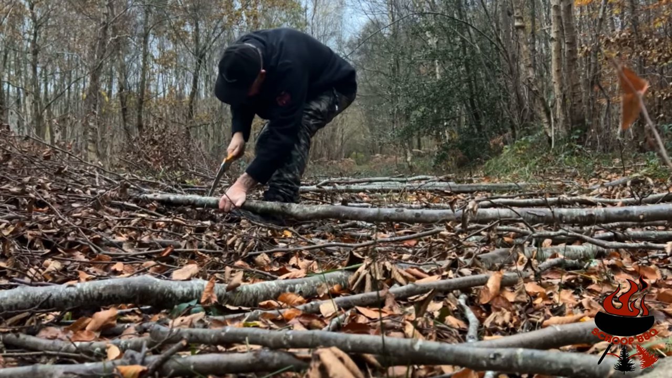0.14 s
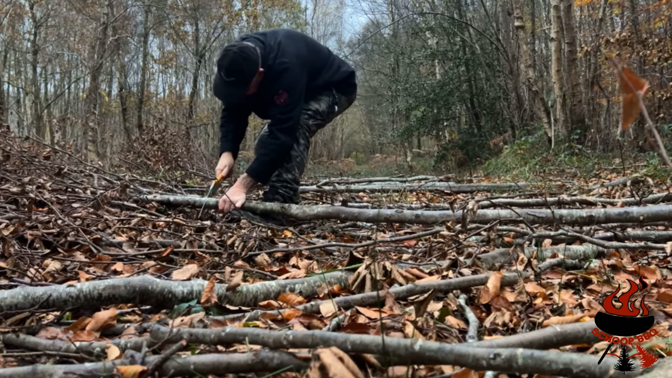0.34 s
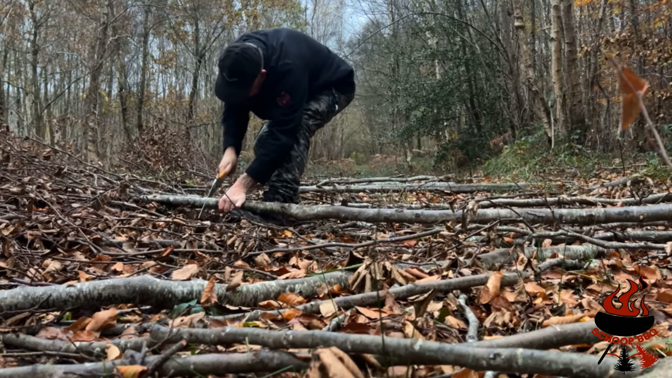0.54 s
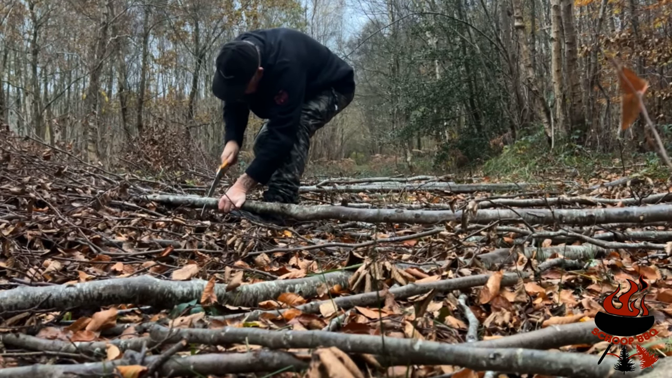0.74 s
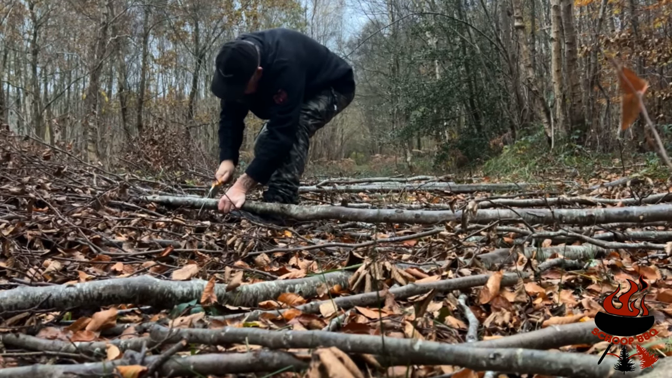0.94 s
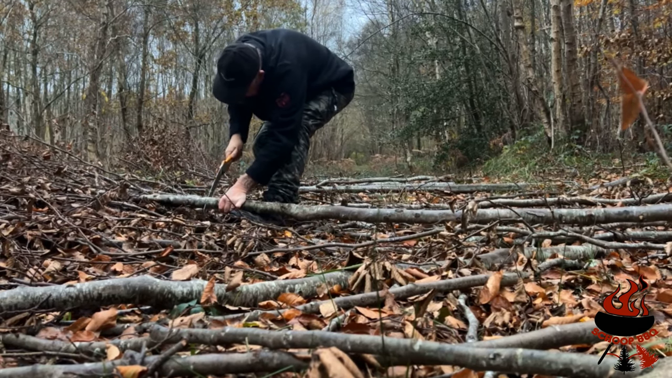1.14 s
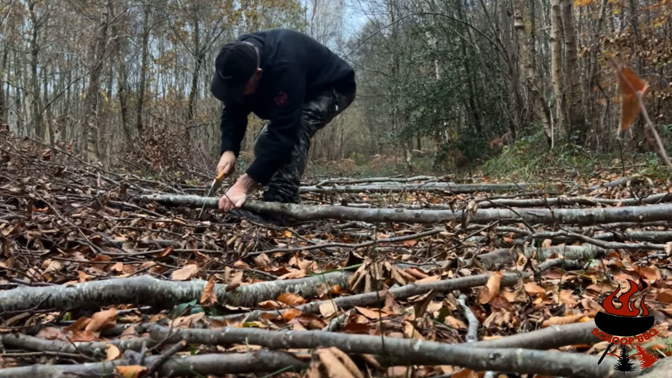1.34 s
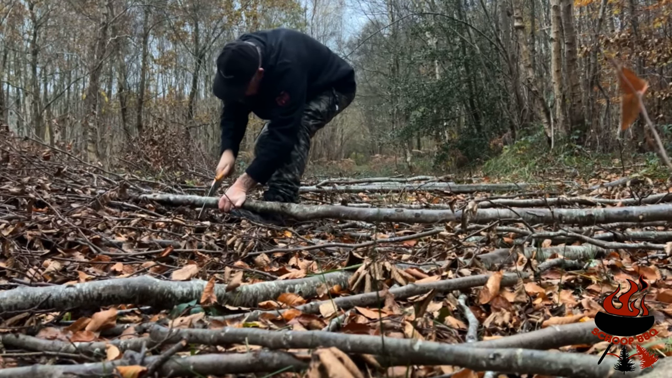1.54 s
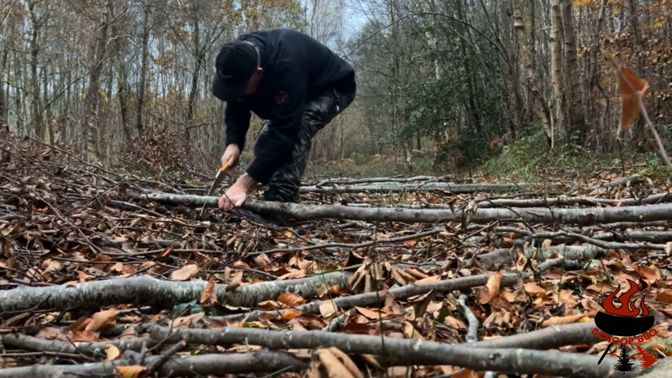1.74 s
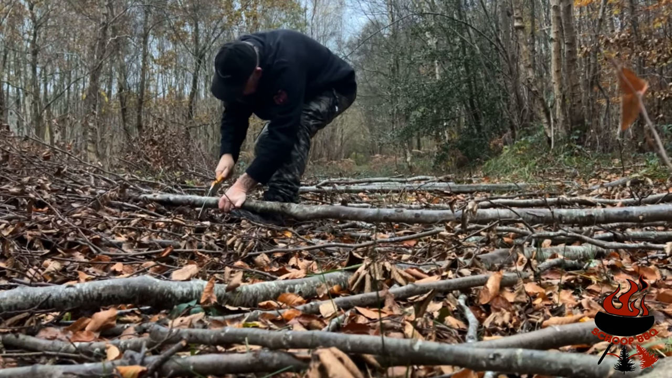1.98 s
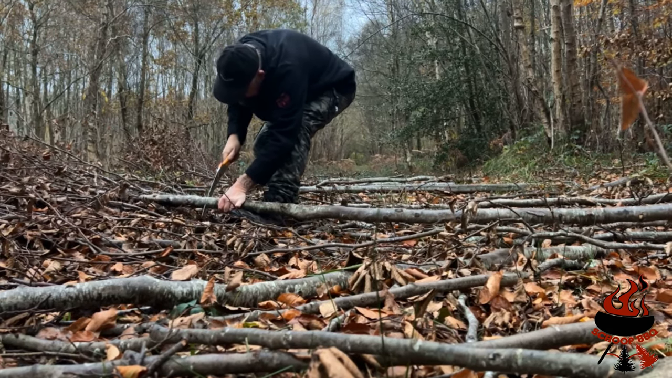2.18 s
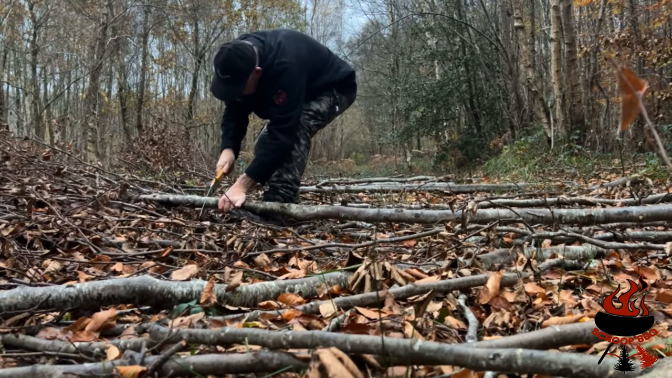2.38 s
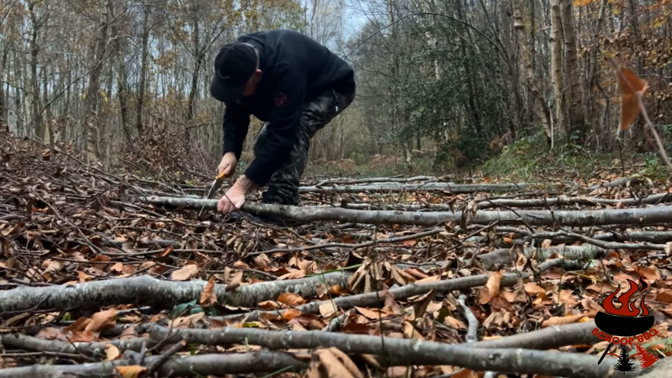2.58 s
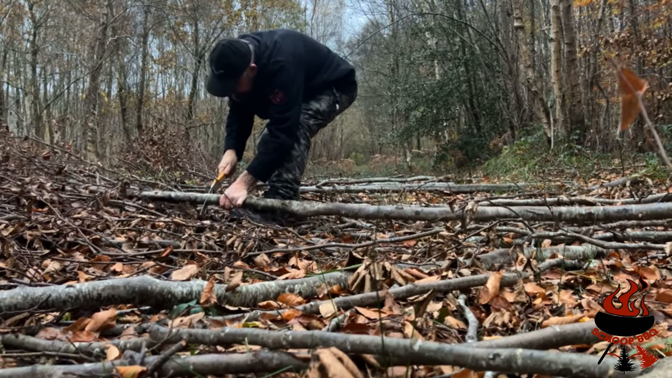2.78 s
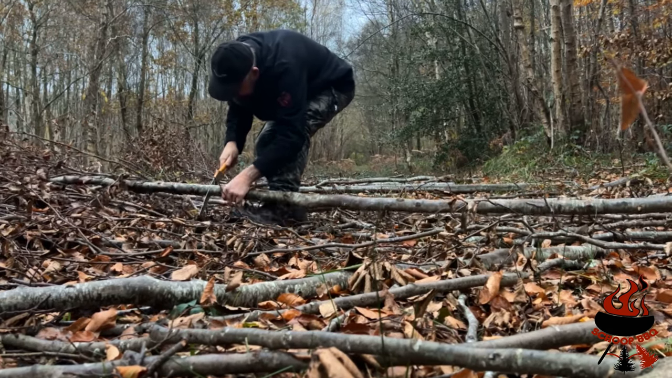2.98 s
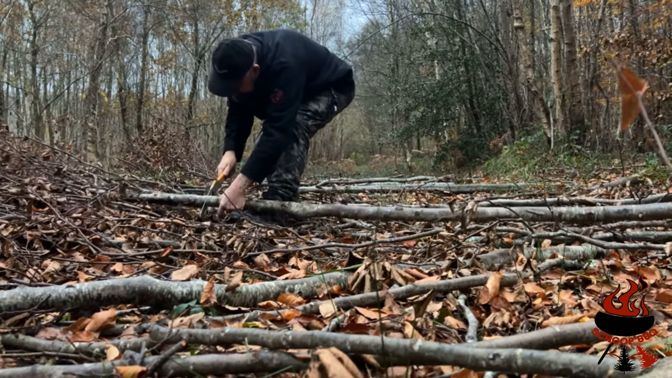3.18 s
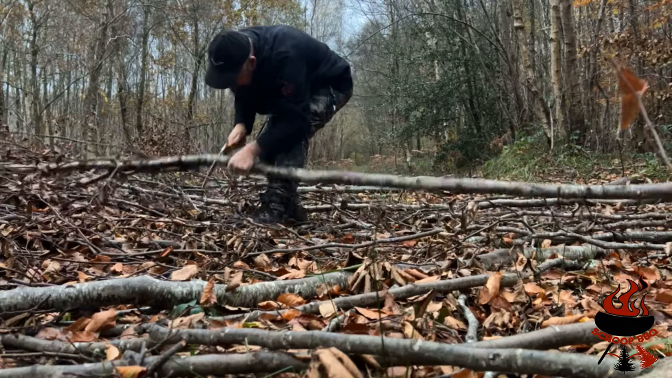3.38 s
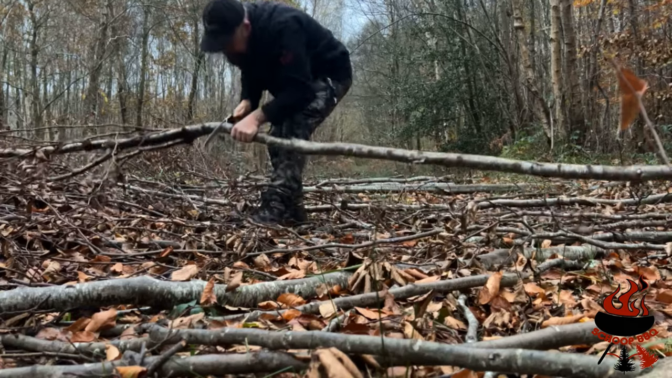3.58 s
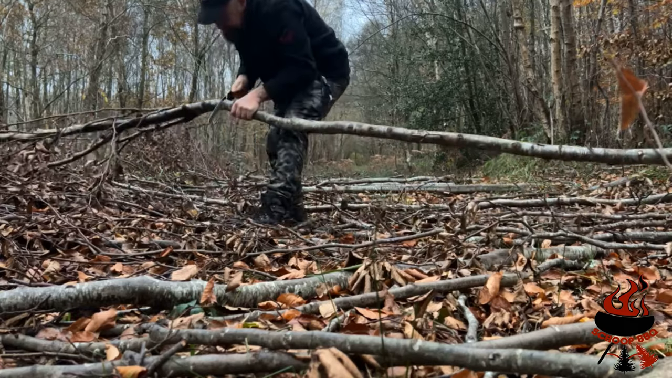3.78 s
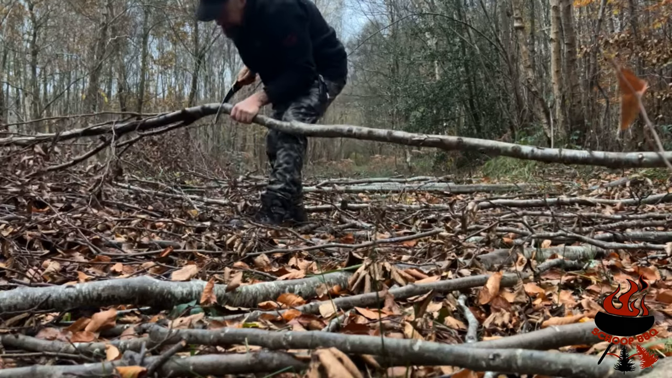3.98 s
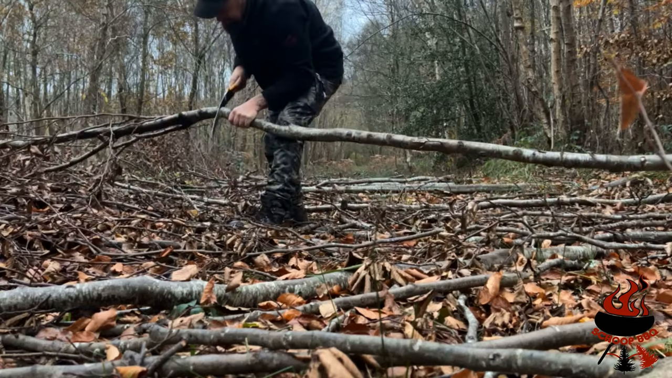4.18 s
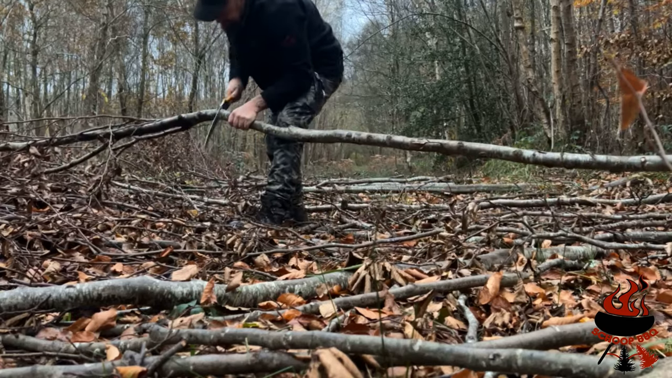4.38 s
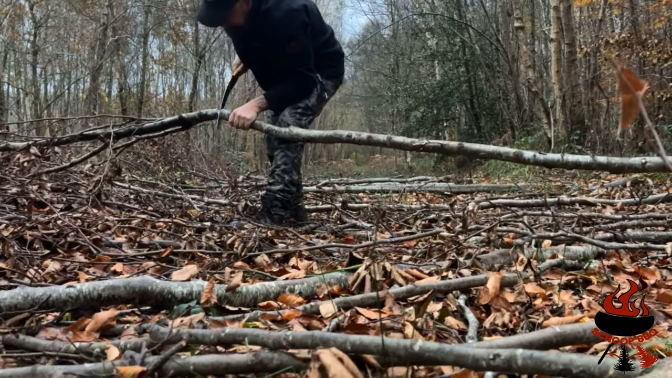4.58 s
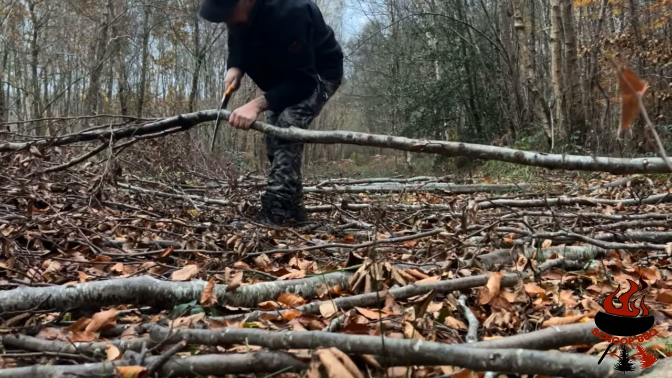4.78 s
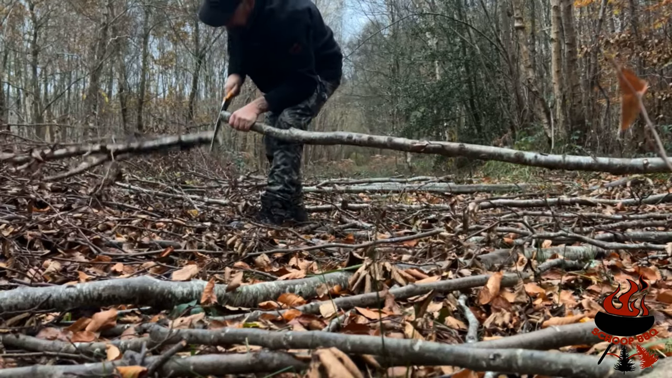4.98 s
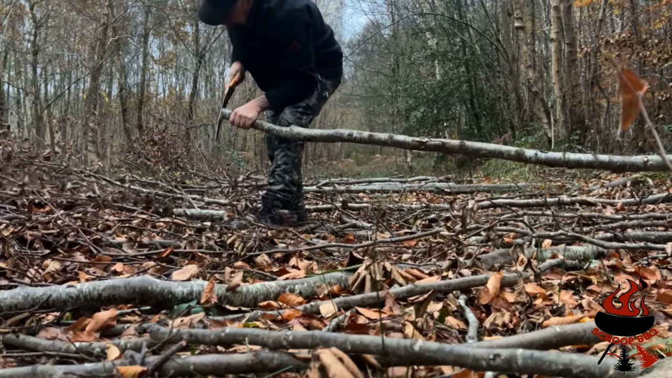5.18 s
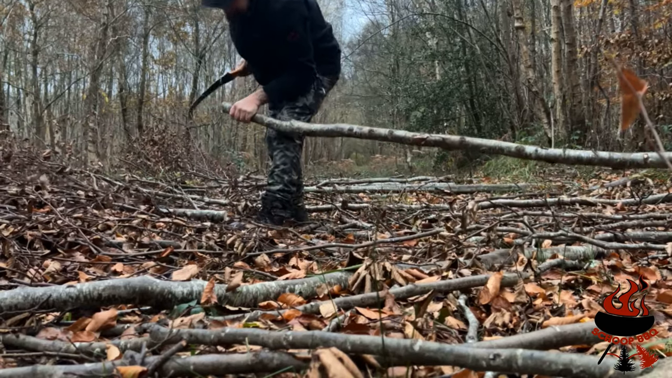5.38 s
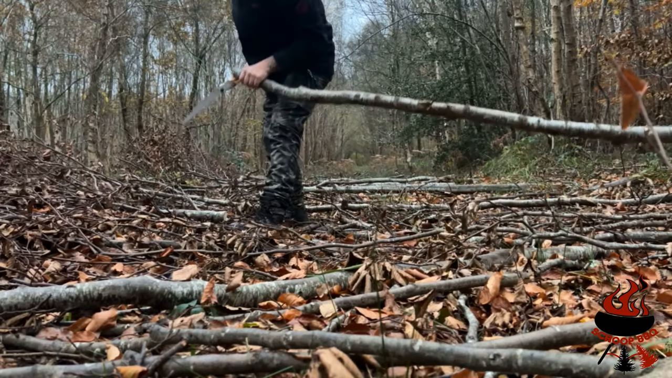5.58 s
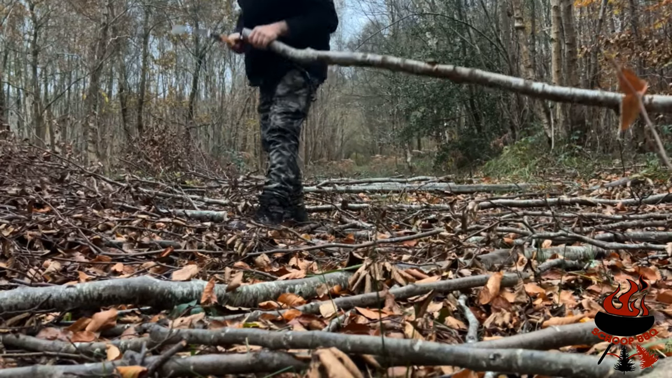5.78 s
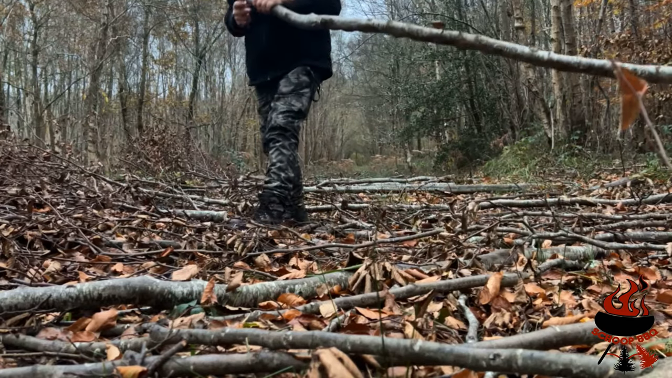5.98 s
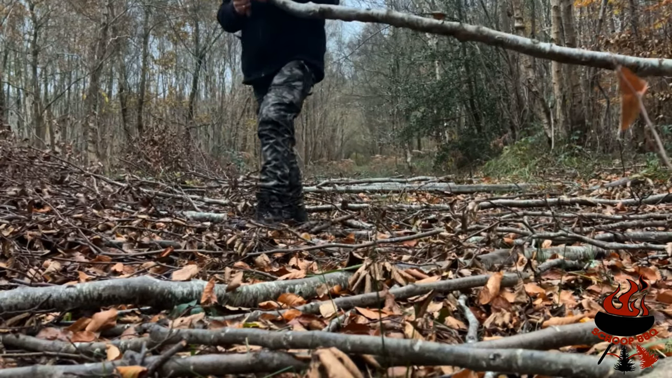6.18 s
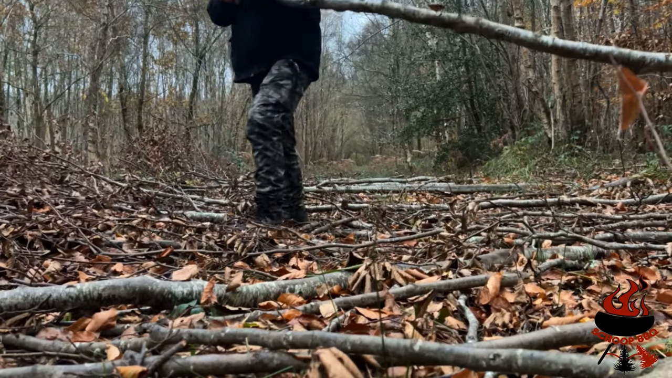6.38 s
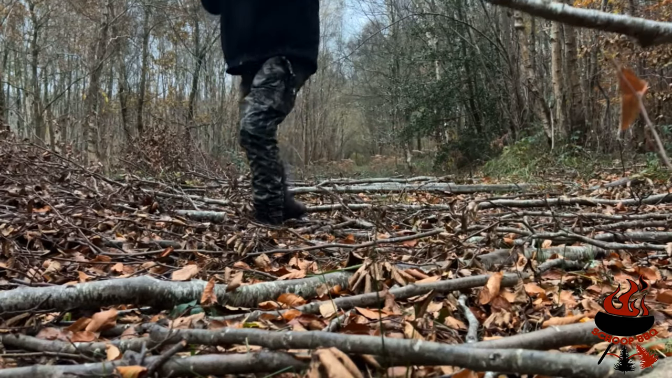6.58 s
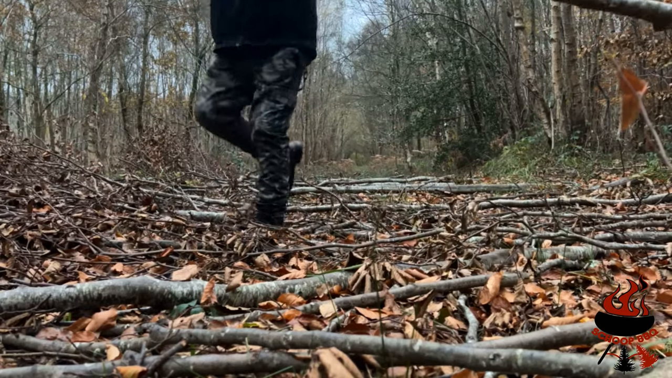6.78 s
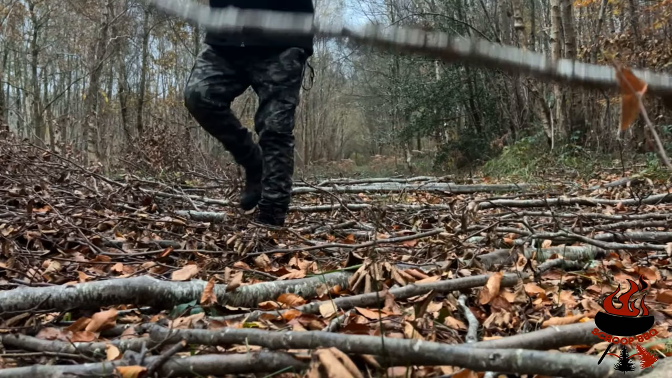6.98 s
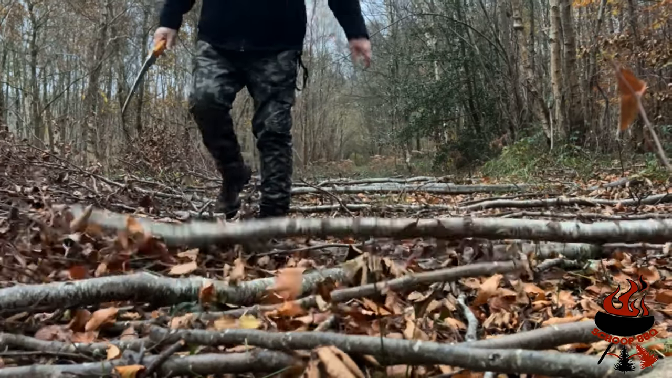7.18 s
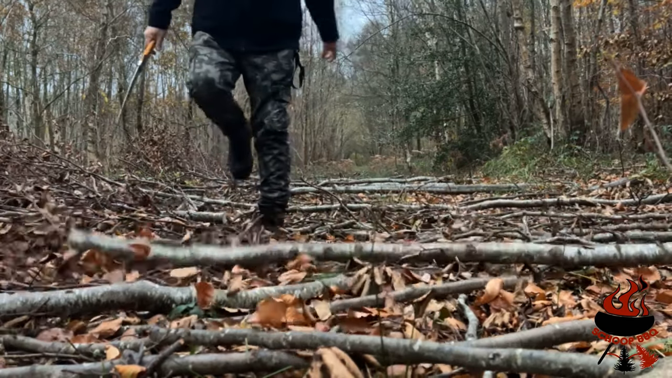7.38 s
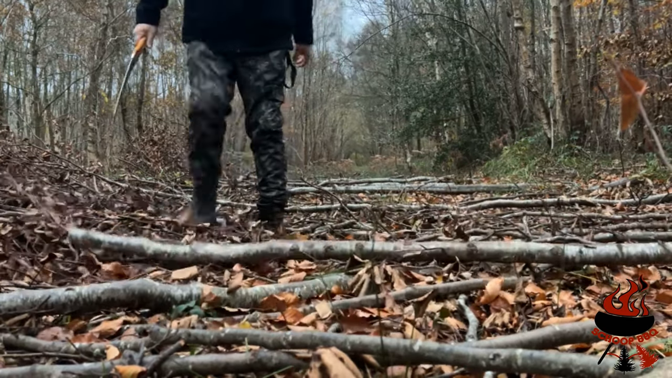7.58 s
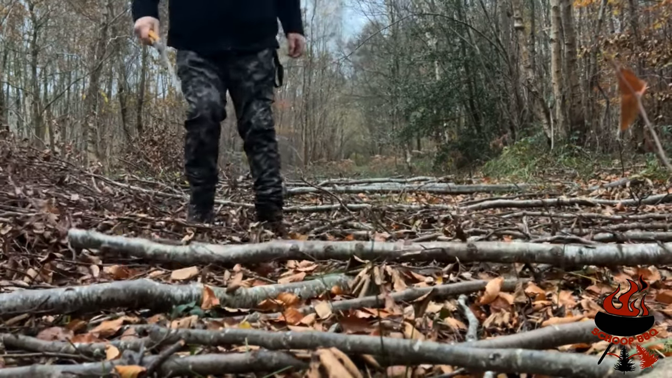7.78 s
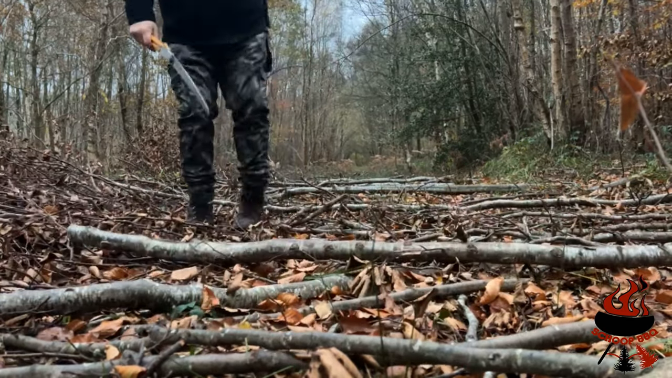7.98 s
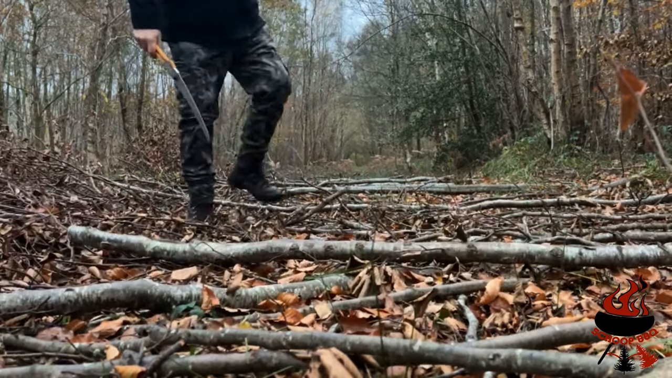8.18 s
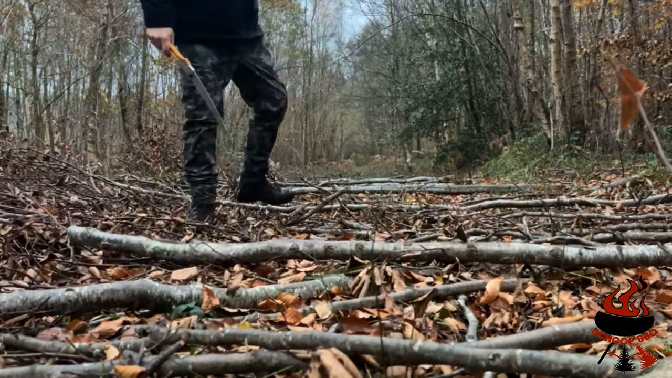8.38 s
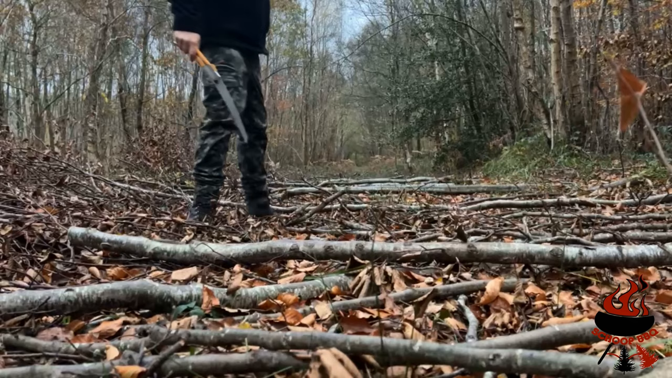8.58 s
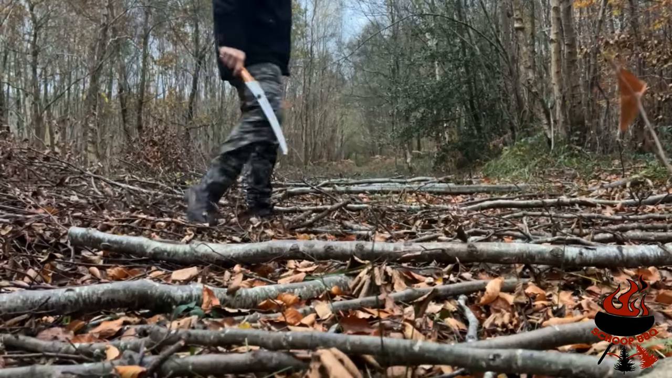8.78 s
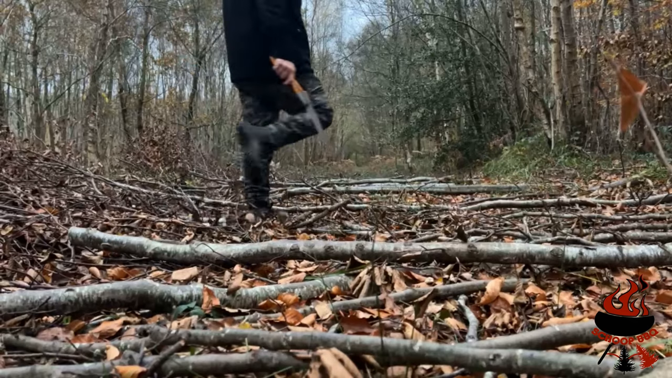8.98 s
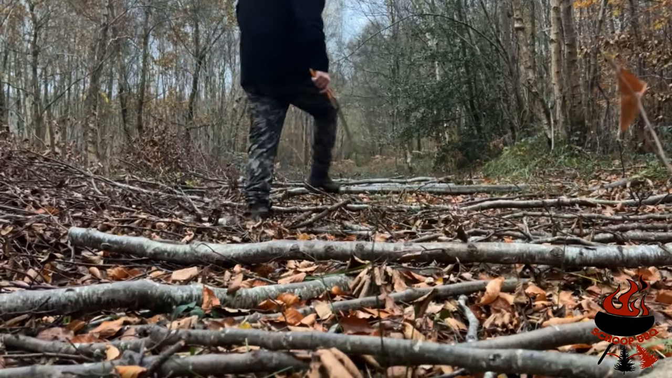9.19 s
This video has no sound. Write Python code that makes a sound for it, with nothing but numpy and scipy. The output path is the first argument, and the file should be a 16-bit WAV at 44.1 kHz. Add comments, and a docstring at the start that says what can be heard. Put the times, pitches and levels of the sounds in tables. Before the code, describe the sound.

Quiet open woodland, a stereo microphone near the ground, faint distant low rumble and slight hiss. From 0 to 2.9 s a small hand saw cuts wood in quick alternating pushes and pulls, each about 0.13 s, gritty and hissy with a low woody buzz; the last strokes weaken and bind. Leaves stir faintly. At 3.3 s the branch gives way in a dense, very sharp splintering crackle lasting under a tenth of a second, with dull knocks and a soft scattered echo. Leaves rustle to 3.9 s. From 4.0 to 5.1 s seven brisker, brighter, more resonant strokes finish the cut; a soft low thump and leaf crush follow at 5.15 s. Sparse rustles and twig ticks until 7.0 s. At 7.13 s the pole lands loudly, a hollow woody whack with rattling sticks and crushed leaves, bouncing duller at 7.4 and 7.6 s. Light boot crunches and twig snaps at 8.0, 8.7 and 9.0 s.

```python
"""Sawing a fallen branch in a forest

A small hand saw cuts in quick pushes and pulls: toothed noise bursts excite blade, cut and branch.
The branch cracks as it is lifted (short bursts over tearing noise), and more strokes free its top.
The pole is tossed into dry leaves and bounces: dispersed blows with a modal ring and a rattle.
Boots shuffle through leaves and twigs, made of random crackle. The trunks scatter a soft echo,
made by convolution with decaying noise, over a distant rumble of shaped noise."""
import sys
import numpy as np
from scipy import signal
from scipy.fft import rfft, irfft, next_fast_len
from scipy.io import wavfile
from scipy.ndimage import uniform_filter1d, map_coordinates

SR = 44100
rng = np.random.default_rng(int(sys.argv[2]) if len(sys.argv) > 2 else 0)


def inscribe(sig):
    """Save sig as 16-bit PCM at rate SR to the path in sys.argv[1].

    A 1-D sig is mono; a 2-D sig holds one channel per row.
    Samples are clipped to [-1, 1] before scaling.
    """
    pcm = np.round(np.clip(np.atleast_2d(sig).T, -1, 1) * 32767)
    wavfile.write(sys.argv[1], SR, pcm.astype(np.int16))


N = 407908
TIME = np.arange(N) / SR  # s
LIFT_S = 3.5  # strokes before this cut the branch on the ground, later ones in the air

# saw strokes, pushes and pulls in turn: (start [s], end [s], force [dB], binding of the blade [0-1])
SAW_STROKES = [(0.003, 0.157, -56.5, 0.06), (0.161, 0.3, -56, 0.15), (0.339, 0.49, -56.5, 0.03),
               (0.51, 0.622, -53.5, 0), (0.668, 0.815, -54, 0.11), (0.824, 0.944, -54, 0.04),
               (0.985, 1.145, -55.5, 0), (1.156, 1.28, -54, .05), (1.34, 1.476, -54.5, 0.1),
               (1.476, 1.608, -55, 0), (1.672, 1.813, -55.5, 0.01), (1.831, 1.957, -55.5, 0),
               (2.026, 2.176, -55.5, 0.28), (2.199, 2.309, -50.5, 0.4), (2.356, 2.481, -58, 0.26),
               (2.576, 2.721, -59.5, 0.73), (2.772, 2.939, -59, .55), (3.976, 4.108, -50, 0.04),
               (4.119, 4.284, -52, 0.26), (4.294, 4.427, -52, 0.17), (4.43, 4.597, -53, 0.33),
               (4.604, 4.73, -52.5, 0), (4.747, 4.893, -49.5, 0.06), (4.912, 5.072, -47.5, 0.7)]
# spectrum of splintering wood: (frequency [Hz], level [dB])
SPLINTER_SPECTRUM = [(180, -36.5), (300, -6.5), (391, -4.5), (563, -20.5), (747, -6.5), (927, -10),
                     (1360, 2), (1600, -4.5), (2910, -4), (6240, -9), (15800, -23.5)]


def amp(db):
    """Level to amplitude: 20 dB is a factor of ten."""
    return 10 ** (np.asarray(db) / 20)


def unit(x):
    """Normalisation to an rms of 1."""
    return x / np.sqrt(np.mean(x ** 2) + 1e-20)


def along(points, hz):
    """Linear interpolation of (frequency, value) points on a logarithmic frequency axis."""
    f, v = np.transpose(points)
    return np.interp(np.log(hz + 1), np.log(f + 1), v)


def filtered(x, response):
    """Linear filtering: the spectrum of x times a complex frequency response."""
    m = next_fast_len(N + 8192, real=True)
    return irfft(rfft(x, m) * response(np.fft.rfftfreq(m, 1 / SR)), m)[..., :N]


def coloured(x, spectrum):
    """Spectral shaping: x through a gain curve in dB, at rms 1."""
    return unit(filtered(x, lambda f: amp(along(spectrum, f))))


def resonant(x, modes):
    """Modal response: x through parallel damped resonators (Hz, width Hz, dB), at rms 1."""
    def response(f):
        return sum(amp(db) * 1j * f * width / (centre ** 2 - f * f + 1j * f * width)
                   for centre, width, db in modes)
    return unit(filtered(x, response))


def band(x, low_hz, high_hz):
    """Band-pass filtering with steep skirts, at rms 1."""
    return unit(filtered(x, lambda f: 1 / (1 + (low_hz / (f + 1)) ** 8) / (1 + (f / high_hz) ** 8)))


def hump(f, centre_hz, octaves):
    """Gaussian gain on the log-frequency axis; octaves is its standard deviation."""
    return np.exp(-.5 * (np.log2((f + 1) / centre_hz) / octaves) ** 2)


def add(track, s, sound):
    """Superposition: mix a sound into the track from time s."""
    part = track[max(round(s * SR), 0):][:len(sound)]
    part += sound[:len(part)]


def bursts(impulses, life):
    """Shot noise: each impulse releases noise whose amplitude falls to 1/e in life seconds."""
    power = signal.lfilter([1], [1, -np.exp(-2 / (life * SR))], impulses ** 2)
    return unit(np.sqrt(power) * rng.standard_normal(N))


def crackle(rate, spread_db, life):
    """Random point process: rate fractures a second, their levels in dB spread exponentially."""
    sizes = amp(spread_db * np.minimum(rng.exponential(size=N), 4))
    return bursts((rng.random(N) < rate / SR) * sizes, life)


def wandering(x, depth_db):
    """Time-varying filtering: spectral peaks and hollows pass as the point of contact shifts."""
    z = signal.stft(x, nperseg=512)[2]
    field = uniform_filter1d(rng.standard_normal(z.shape), size=3, axis=0)
    field = uniform_filter1d(field, size=12, axis=1)
    return unit(signal.istft(z * amp(depth_db * unit(field)), nperseg=512)[1][:N])


def wobble(rate):
    """Low-rate modulation: a smooth random curve with rate knots a second."""
    return map_coordinates(rng.standard_normal(int(N * rate / SR) + 4), [TIME * rate])


def swell(s, db, rise, t60):
    """Exponential envelope: gain that grows towards time s and decays by 60 dB in t60 seconds."""
    decay = amp(db - 60 * np.maximum(TIME - s, 0) / t60)
    return decay * np.exp(np.minimum(TIME - s, 0) / rise)


def sawing(strokes, mix, wood, rasp, hiss, tooth_hz, tear_life, kick, sweep, ring_db, speed_law):
    """Forced vibration: blade speed sets tooth rate and strength; blade, cut and branch respond."""
    fastest_free, bind_earlier = .69, .48  # point of top speed in a free stroke; binding brings it forward
    drag = 1.0  # drag in the cut flattens the top of each stroke
    jolt_db, jolt_at, jolt_share = 4, .72, 0.085  # the branch jolts as the blade brakes, as shares of a stroke
    # gain at full binding, rasp much less and hiss slightly less: (hiss [dB], rasp [dB], wood [dB])
    bind_gains = (-1, -4, 0)
    speed, reach, gains = np.zeros(N), np.zeros(N), np.zeros((3, N))
    for k, (start, end, force_db, bind) in enumerate(strokes):
        span = (TIME > start) & (TIME < end)
        fastest = np.clip(fastest_free - bind_earlier * bind, .1, .9)
        travel = np.interp(TIME[span], [start, start + fastest * (end - start), end], [0, .5, 1])
        speed[span] = np.tanh(drag * np.sin(np.pi * travel)) / drag ** .5 / np.tanh(drag) ** .5
        reach[span] = travel if k % 2 else 1 - travel
        dbs = force_db + np.array(mix[k % 2]) + bind * np.array(bind_gains)
        gains[:, span] += amp(dbs)[:, None] * speed[span] ** np.array(speed_law)[:, None]
        progress = (TIME[span] - start) / (end - start)
        gains[2, span] *= amp(jolt_db * np.exp(-.5 * ((progress - jolt_at) / jolt_share) ** 2))
    # a tooth bites each time the accumulated phase passes a whole number
    passing = np.diff(np.floor(np.cumsum(tooth_hz * (.2 + speed) / SR)), prepend=0)
    bites = passing * amp(2.3 * rng.standard_normal(N))
    teeth = wandering(bursts(bites, tear_life), depth_db=3.5)
    # waves return from the tip of the blade, sooner as its free length shrinks
    delay = SR * (0.00064 + 0.001 * reach)
    blade = teeth + sweep * map_coordinates(teeth, [np.arange(N) - delay], order=2)
    steel = gains[0] * coloured(blade, hiss)
    # each tooth also kicks the wood: a rough buzz that rises and falls with the stroke
    drive = blade + kick * unit(bites)
    body = coloured(drive, wood) + amp(ring_db) * resonant(drive, rasp)
    cut = amp(-4.0) * gains[1] * band(body, low_hz=613, high_hz=3710)
    # slow bending waves leave the branch a little later
    late_gain = np.interp(TIME - .016, TIME, gains[2])
    branch = amp(-4.0) * late_gain * band(body, low_hz=97, high_hz=593)
    return steel + cut + branch


def saw():
    """Change of boundary condition: the branch responds differently on the ground and held up."""
    # balance, one row for even and one for odd strokes: (hiss [dB], rasp [dB], wood [dB])
    mix_ground = [(0, 1.2, 1), (0, 1.7, 1)]
    mix_air = [(0, 2.1, 3.5), (0, 6.6, 0)]
    # wood spectra: (frequency [Hz], level [dB])
    wood_ground = [(65, -33), (110, -3), (179, 1), (293, -6), (388, 1), (579, -13), (651, -11), (733, -15),
                   (876, -8.5), (1060, -13), (1580, -12), (3800, -23.5), (4940, -47.5), (8360, -120)]
    wood_air = [(59, -31), (100, -10.5), (299, -5.5), (388, -4), (472, -22), (525, -8.5), (593, -34),
                (670, -14), (734, 0.5), (1090, -0.5), (1180, 5.5), (2600, 0), (3800, -4.5), (4940, -42),
                (8360, -120)]
    # rasp resonances: (frequency [Hz], width [Hz], level [dB])
    rasp_ground = [(680, 21, 12), (846, 49, 3.5), (1588, 90, 3), (2730, 160, 1.1), (3450, 43, 5.7)]
    rasp_air = [(680, 19, 4), (1057, 23, 8), (2070, 120, -1), (2640, 83, 5.5)]
    # blade hiss spectra: (frequency [Hz], level [dB])
    hiss_ground = [(1940, -32.5), (3300, -5.5), (6520, -3.5), (7240, -6.5), (8310, -2), (9290, -1.5),
                   (10100, -6.5), (10900, -7.5), (11300, 0), (12300, -10), (13700, -28), (14900, -13),
                   (15800, -16)]
    hiss_air = [(1940, -38), (3300, -13.5), (4990, -6), (5500, -6), (7100, -7), (8480, 1), (10100, -7),
                (11000, -9), (11800, -4), (13000, -16.5), (13700, -17.5), (14900, -12.5), (15800, -16)]
    # tooth_hz is the tooth rate per unit of speed; speed_law holds exponents for hiss, rasp, wood
    down = sawing([r for r in SAW_STROKES if r[0] < LIFT_S], mix_ground, wood_ground, rasp_ground, hiss_ground,
                  tooth_hz=585.0, tear_life=0.0085, kick=0.75, sweep=0.12, ring_db=-13.5,
                  speed_law=(1.2, 1.05, .7))
    up = sawing([r for r in SAW_STROKES if r[0] > LIFT_S], mix_air, wood_air, rasp_air, hiss_air,
                tooth_hz=558.4, tear_life=0.0038, kick=0.35, sweep=0.27, ring_db=-11.5,
                speed_law=(1.05, .9, .5))
    return down + up


def fractures(rows, octaves, t60, after_db, after_t60):
    """Impulsive release: each break is a short band of noise, with a weaker, longer shiver."""
    lead = .004  # s of room ahead of each break
    out, t = np.zeros(N), np.arange(8192) / SR - lead
    f = np.fft.rfftfreq(len(t), 1 / SR)
    decay = (t >= 0) * (amp(-60 * np.abs(t) / t60) + amp(after_db - 60 * np.abs(t) / after_t60))
    for s, db, hz in rows:
        snap = irfft(rfft(decay * rng.standard_normal(len(t))) * hump(f, hz, octaves))
        add(out, s - lead, amp(db) * snap / np.abs(snap).max())
    return out


def breaking():
    """Progressive failure: bundles of the half-cut branch snap amid ever harder tearing fibres."""
    # fibre bundles breaking: (time [s], peak level [dB], centre frequency [Hz])
    cracks = [(3.307, -16.5, 7360), (3.3097, -17.5, 2846), (3.327, -22.5, 1900), (3.3372, -11.5, 3456),
              (3.3402, -7, 6520), (3.347, -16.5, 5000), (3.3594, -7.5, 3400), (3.361, -11.5, 5980),
              (3.364, -13, 1700), (3.3722, -19.5, 3790)]
    first_db, last_db, tear_t60 = -44, -23.5, 0.077  # tearing from first crack to last, then its decay [s]
    strain_rise_s = 0.018  # the wood starts to give just before the first crack
    shred_db, shred_rise_s, shred_t60 = -24.5, 0.001, 0.07  # fibres torn along with each bundle
    first, last = cracks[0][0], cracks[-1][0]
    strain_db = np.interp(TIME, [first, last], [first_db, last_db])
    onset = np.exp(np.minimum(TIME - first, 0) / strain_rise_s)
    tear = onset * amp(strain_db - 60 * np.maximum(TIME - last, 0) / tear_t60)
    shred_power = sum(swell(s, db + shred_db, shred_rise_s, shred_t60) ** 2 for s, db, hz in cracks)
    fibres = crackle(rate=1600, spread_db=2.5, life=.0006)
    tearing = np.sqrt(tear ** 2 + shred_power) * coloured(fibres, SPLINTER_SPECTRUM)
    return tearing + fractures(cracks, octaves=0.49, t60=0.0078, after_db=-20, after_t60=0.1)


def knocks(travel, ring_db, rattle_t60):
    """Dispersion: bending waves carry treble faster, so blows fall in pitch; pole and sticks respond."""
    # blows on wood and soil: (time [s], peak level [dB], centre frequency [Hz], width [octaves])
    blows = [(2.635, -41.5, 319, 0.53), (3.353, -33, 329, .9), (3.372, -31.5, 323, 1.2),
             (3.387, -30.5, 346, 0.19), (3.479, -34, 1074, 1.2), (3.497, -38, 410, 0.3),
             (3.758, -40, 273, 0.99), (3.776, -44.5, 550, 1), (3.789, -44.5, 151, 0.48),
             (5.15, -30.5, 170, 0.78), (6.478, -47, 890, 2.8), (6.97, -43.5, 394, 0.51),
             (7.045, -33.5, 700, 0.96), (7.129, -16.5, 1960, 0.76), (7.130, -5.5, 724, .82),
             (7.135, -10, 476, 0.22), (7.143, -10.5, 460, 0.18), (7.158, -18, 175, 1.3),
             (7.366, -28, 967, 2), (7.387, -21.5, 560, 0.37), (7.399, -27, 221, 1.3),
             (7.567, -21.5, 293, 0.63), (7.596, -32, 328, 0.55), (8.028, -37, 1400, 1.6),
             (8.037, -39.5, 351, .9), (8.700, -37.5, 288.6, 0.67), (8.812, -40.5, 332, .8),
             (9.094, -45, 372, 0.92)]
    # modes of the pole: (frequency [Hz], relative level [dB], decay time t60 [s])
    pole_modes = [(117.8, 1, 0.67), (146, -3, 0.58), (326, -4, 0.19), (390, -5.5, 0.14), (467, 15, 0.034),
                  (652, -10, 0.098), (857, 2.5, 0.16), (1080, -8, .1), (1460, 3.5, .08), (2600, 5, .1)]
    out, t = np.zeros(N), np.arange(SR) / SR
    f = np.fft.rfftfreq(SR, 1 / SR)
    lead = .05  # s of room for the early treble
    modes = np.array([amp(db - 60 * t / t60) * np.sin(2 * np.pi * hz * t) for hz, db, t60 in pole_modes])
    for s, db, hz, octaves in blows:
        # group delay, zero at the centre frequency
        delay = travel * (np.sqrt(1000 / (f + 1)) - np.sqrt(1000 / hz))
        # bark softens the contact
        contact = hump(f, hz, octaves) / np.sqrt(1 + f / hz) / (1 + (f / 4800) ** 4)
        # the bins are 1 Hz apart, so a running sum of the delay gives the phase
        push = irfft(contact * np.exp(-2j * np.pi * np.cumsum(delay + lead)), SR)
        ring = amp(ring_db + rng.normal(0, 1.3, len(pole_modes))) @ modes
        sticks = rng.standard_normal(SR) * amp(-60 * t / rattle_t60)
        response = ring + .6 * sticks / np.linalg.norm(sticks)
        blow = push + signal.fftconvolve(push, response)[:SR]
        add(out, s - lead, amp(db) * blow / np.abs(blow).max())
    return out


def chatter():
    """Repeated contact: sticks splinter as the pole lands, then many small dull contacts die away."""
    landing_s = 7.128
    sticks = coloured(crackle(rate=1500, spread_db=2.5, life=.001), SPLINTER_SPECTRUM)
    contacts = filtered(crackle(rate=300, spread_db=-2.5, life=0.0045), lambda f: hump(f, 188, .85))
    splintering = swell(landing_s, db=-20, rise=0.0068, t60=0.08) * sticks
    settling = swell(landing_s + .035, db=-37, rise=0.015, t60=.65) * unit(contacts)
    return splintering + settling


def snaps():
    """Brittle fracture: twigs snap and saw teeth catch."""
    # (time [s], peak level [dB], centre frequency [Hz])
    snap_events = [(2.6135, -49, 7980), (3.628, -32, 8080), (3.629, -37.5, 2760), (3.932, -43, 6010),
                   (3.9906, -33, 11130), (4.150, -41, 1600), (4.3022, -37.5, 10880), (4.764, -37.5, 3500),
                   (4.9342, -26, 7780), (5.916, -45.5, 4000), (6.0196, -41.5, 6000), (6.5141, -37, 6000),
                   (6.8414, -46, 7530), (6.872, -37.5, 8560), (6.9282, -42, 8170), (7.0865, -20.5, 7500),
                   (8.4455, -44.5, 5600), (8.841, -36.5, 5300), (8.979, -30, 11220), (8.9887, -33, 3320)]
    return fractures(snap_events, octaves=0.48, t60=0.012, after_db=-13.5, after_t60=0.21)


def stir(start, end, db):
    """Attack, hold and release: leaves yield over the first part of a movement and settle slowly."""
    attack_share, settle_t60 = 0.17, 1  # share of the movement; s
    attack = np.clip((TIME - start) / (attack_share * (end - start)), 0, 1)
    return attack * amp(db - 60 * np.maximum(TIME - end, 0) / settle_t60)


def leaves():
    """Granular friction: dry leaves crackle when stirred and burst out when a weight presses them."""
    # boots and branch moving through leaves: (start [s], end [s], level [dB])
    movements = [(2.203, 2.503, -60), (2.796, 2.948, -61), (3.066, 3.281, -61.5), (3.309, 3.5, -51.5),
                 (3.745, 3.93, -55.5), (5.132, 5.42, -56.5), (5.832, 6.171, -61.5), (6.36, 6.52, -61.5),
                 (6.56, 6.693, -56.5), (6.971, 7.2, -51.5), (7.195, 7.551, -47), (7.67, 7.965, -57),
                 (8.603, 8.893, -56), (8.97, 9.14, -65)]
    # leaves crushed by a falling weight: (time [s], level [dB], rise [s], decay time t60 [s])
    crushes = [(5.135, -35, 0.028, 0.55), (7.044, -40.5, 0.038, .2), (7.125, -23, 0.015, 0.15),
               (7.188, -36, 0.04, 0.31), (7.382, -31, 0.015, 0.18), (7.61, -44, 0.057, 0.316),
               (8.69, -51.5, 0.032, 0.21), (8.992, -46, .012, 0.24)]
    # spectra of stirred and of crushed leaves: (frequency [Hz], level [dB])
    stirred_spectrum = [(150, -27), (250, -4.5), (413, -4), (828, -21), (1130, -17), (1870, -18.5),
                        (4230, -15), (8760, -14.5), (10100, -22), (11400, -20.5), (13800, -38),
                        (15800, -32)]
    crushed_spectrum = [(120, -26.5), (200, -1), (577, -9.5), (1200, -13), (2110, -12.5), (3660, -13),
                        (4010, -11), (8330, -11), (10200, -12), (11600, -15), (13700, -28), (15800, -23)]
    rock_db = -8  # leaves under the rocking branch, against the force of the stroke
    twigs_per_s, twig_db = 16, -11  # small twigs giving way among the leaves
    clump_db, clumps_per_s = 2.0, 30  # leaves give way in clumps
    boot_db, boot_hz, boot_octaves = -8.5, 200, .9  # soft soil shifting under each movement

    rocking = [(start, end, db + rock_db) for start, end, db, bind in SAW_STROKES if start < LIFT_S]
    stirred = np.max([stir(*move) for move in movements + rocking], axis=0)
    stalks = crackle(rate=70, spread_db=3.5, life=.0015)
    litter = wandering(crackle(rate=3600, spread_db=2, life=0.0017) + 0.38 * stalks, depth_db=2.0)
    twigs = wandering(crackle(rate=twigs_per_s, spread_db=3.5, life=.002), depth_db=7.5)
    clumps = amp(clump_db * wobble(clumps_per_s))
    rustle = stirred * clumps * coloured(litter + amp(twig_db) * twigs, stirred_spectrum)
    grains = crackle(rate=98, spread_db=2, life=0.0045)
    soil = amp(boot_db) * stirred * unit(filtered(grains, lambda f: hump(f, boot_hz, boot_octaves)))
    weight = sum(swell(*crush) for crush in crushes)
    crushed = coloured(crackle(rate=2100, spread_db=2.0, life=0.0019), crushed_spectrum)
    return rustle + soil + weight * crushed


def forest(x, near_db, far_db):
    """Scattering: logs at the sides answer at once, trunks return a long echo unlike at each port."""
    # decay of the trunk echo: (frequency [Hz], decay time t60 [s])
    trunk_decay = [(100, 0.55), (500, 0.2), (2000, 0.52), (6000, 1), (15000, 0.94)]
    hz, t, z = signal.stft(rng.standard_normal((2, SR)), SR, nperseg=256)
    envelope = amp(-60 * t / along(trunk_decay, hz)[:, None]) * (1 - np.exp(-t / 0.038))
    far = signal.istft(z * envelope, SR, nperseg=256)[1]
    length = far.shape[1]
    near = rng.standard_normal(length) * amp(-60 * np.arange(length) / SR / .06)
    trunks = amp(far_db) * far / np.linalg.norm(far[0])
    logs = amp(near_db) * np.array([near, -near]) / np.linalg.norm(near)  # opposite sign at the two ports
    scattered = signal.fftconvolve(x[None], trunks + logs, axes=1)[:, :N]
    # long waves scatter least: (frequency [Hz], gain [dB])
    scatter_gain = [(80, -7.0), (400, 1.5), (1200, 5), (7000, 3.5), (15000, 1.0)]
    return filtered(scattered, lambda f: amp(along(scatter_gain, f)))


def air():
    """Partial coherence: a distant rumble alike at both ports, under a faint hiss that differs."""
    # the still forest: (frequency [Hz], level [dB])
    air_spectrum = [(13, -68), (22, -33.5), (36, -13.5), (66, -5.5), (135, -21.5), (193, -23), (454, -33),
                    (493, -24), (550, -41), (686, -33), (787, -35.5), (1010, -32), (1290, -37.5),
                    (7520, -51.5), (15800, -74.5)]
    # difference between the ports: (frequency [Hz], gain [dB])
    side_gain = [(70, -18), (200, -9), (700, -2), (8000, -1)]
    mid = coloured(rng.standard_normal(N), air_spectrum)
    side = filtered(coloured(rng.standard_normal(N), air_spectrum), lambda f: amp(along(side_gain, f)))
    return amp(-55.5) * np.array([mid + side, mid - side])


def ports(x, phase):
    """Interchannel differences: phase and level are split evenly between left and right ports."""
    # left minus right: (frequency [Hz], level difference [dB])
    port_tilt = [(60, -1), (500, 0), (1600, 1.3), (3300, 3.5), (6000, 5.5), (8500, 0.9), (15000, -0.5)]

    def half(f):
        return amp(along(port_tilt, f) / 2) * np.exp(.5j * along(phase, f))
    return filtered(x, lambda f: np.array([half(f), 1 / half(f)]))


def scene():
    """Superposition: direct saw and wood sounds, their scattered echo, and the still air."""
    # phase between the two microphone ports: (frequency [Hz], lead of the left [rad])
    saw_phase = [(150, 0), (400, -.7), (900, -1.5), (1500, -1.5), (2800, .9), (6000, .6), (8500, 0),
                 (15500, -12.6)]
    near_phase = [(150, 0), (500, -.6), (1800, -.6), (3000, 1.1), (7500, .7), (8600, -.3), (15500, -12.6)]
    cutting = saw()
    blows = knocks(travel=.007, ring_db=-57, rattle_t60=0.076)
    wood = breaking() + blows + chatter() + snaps() + leaves()
    echo = forest(cutting + wood, near_db=-10, far_db=-19.0)
    return ports(cutting, saw_phase) + ports(wood, near_phase) + echo + air()


def record(dry):
    """Band limitation: nothing passes at or above the cutoff."""
    top_hz = 15850
    return filtered(dry, lambda f: f < top_hz)


dry = scene()
out = record(dry)
inscribe(out)
```